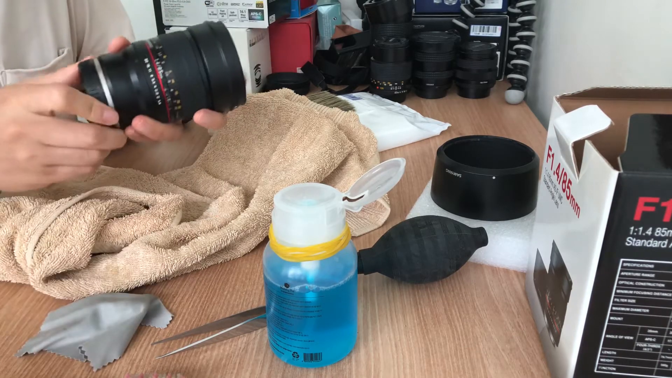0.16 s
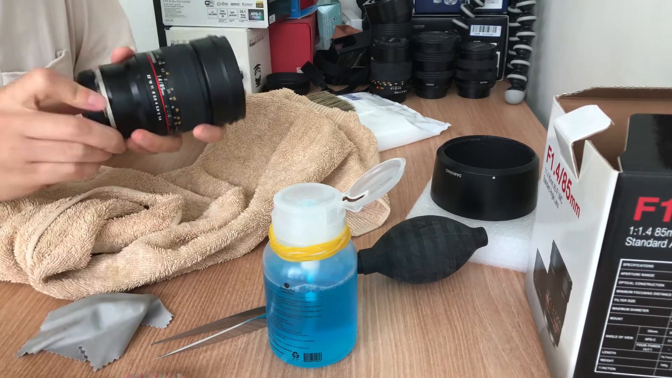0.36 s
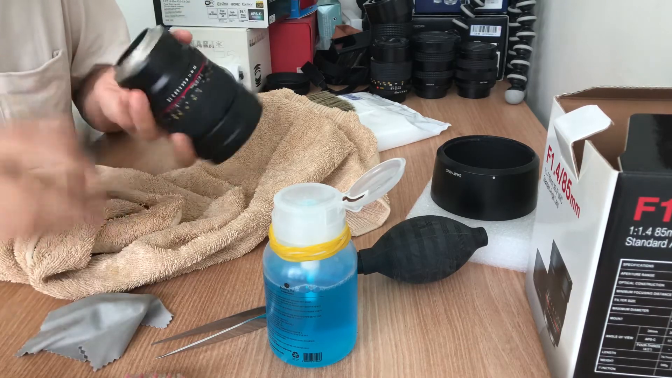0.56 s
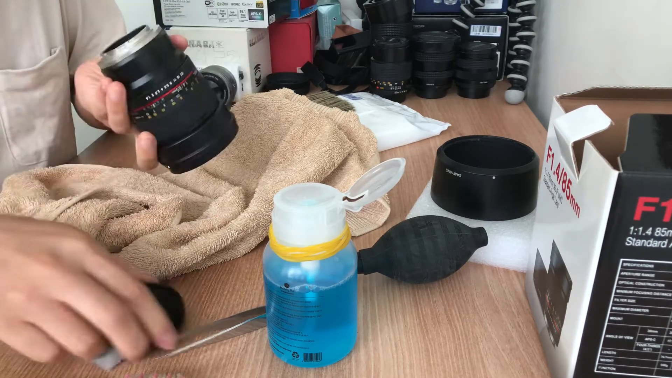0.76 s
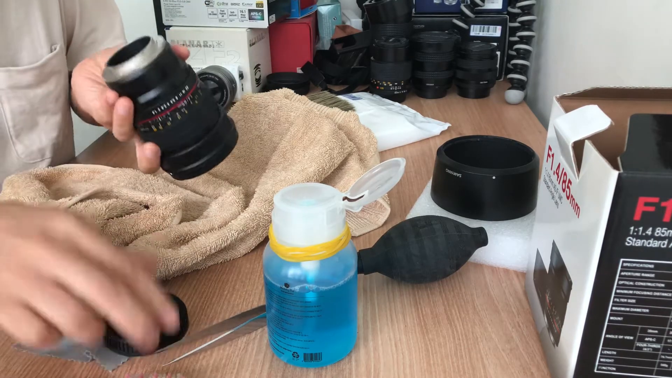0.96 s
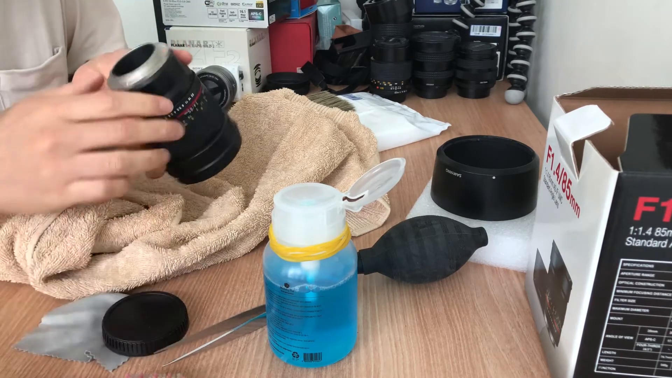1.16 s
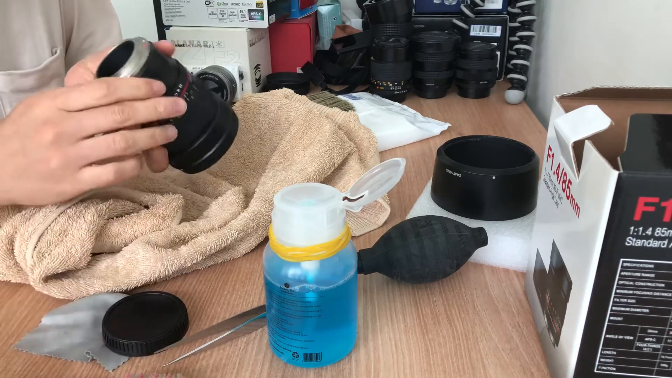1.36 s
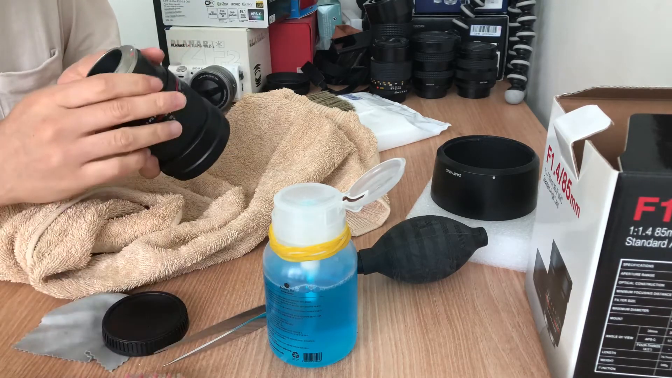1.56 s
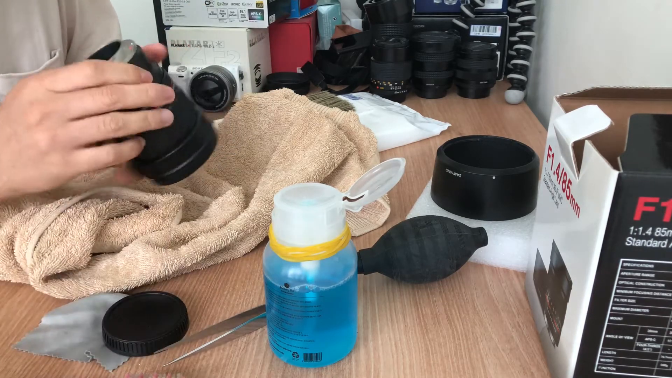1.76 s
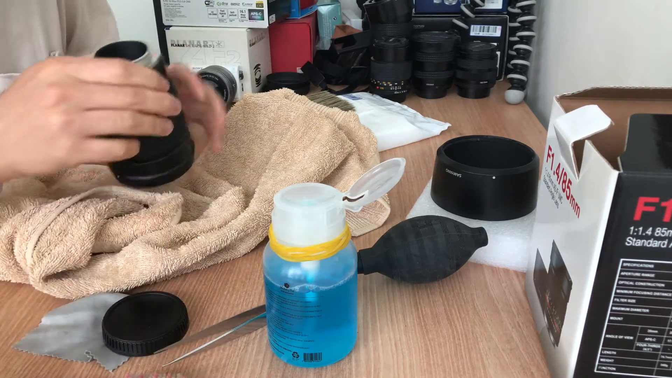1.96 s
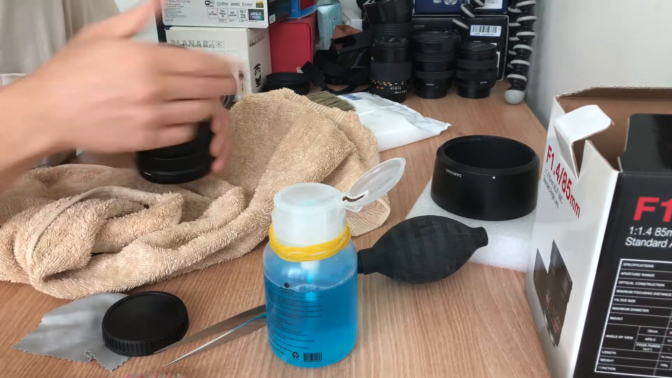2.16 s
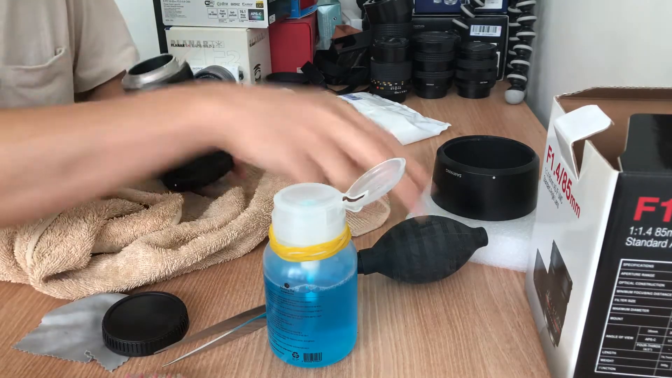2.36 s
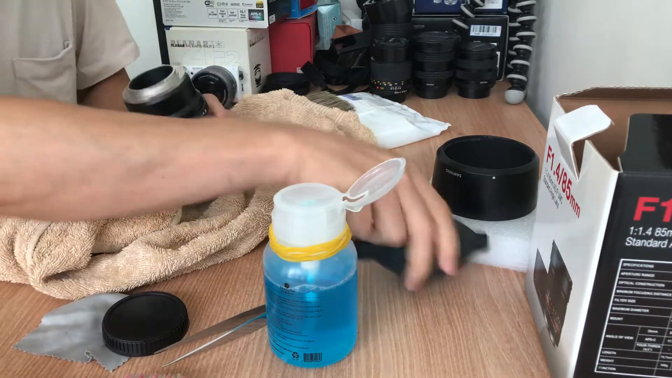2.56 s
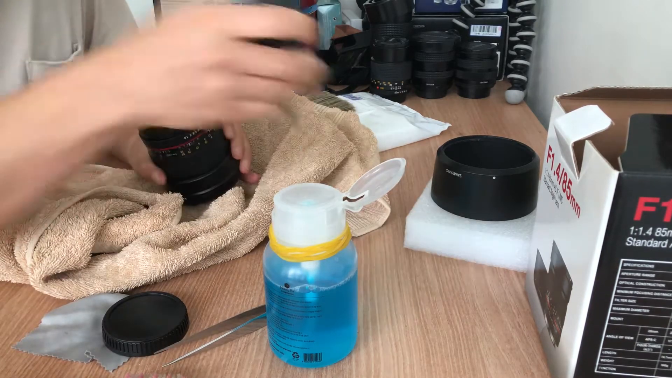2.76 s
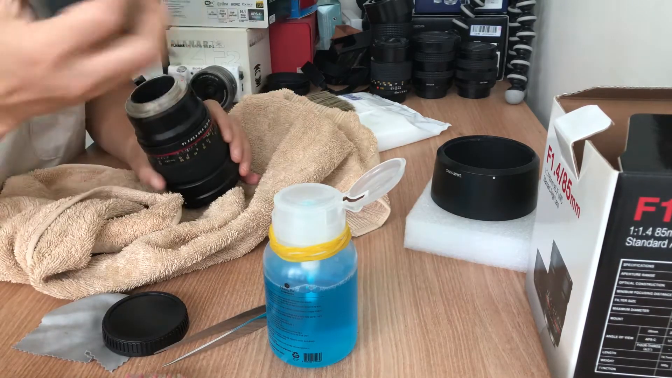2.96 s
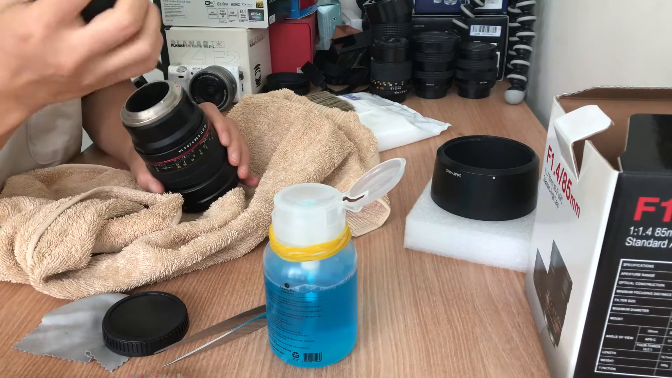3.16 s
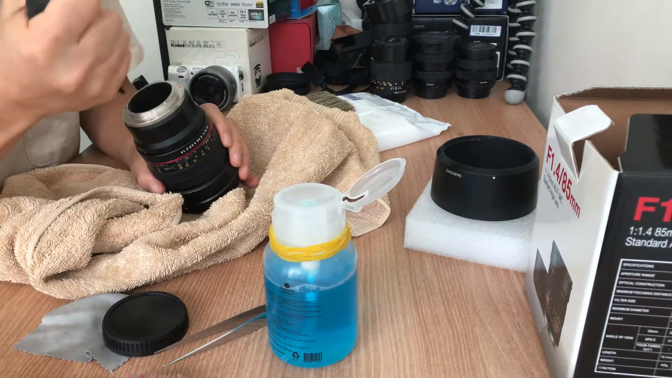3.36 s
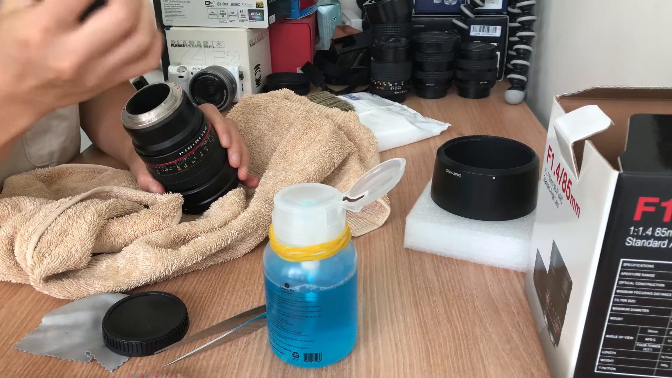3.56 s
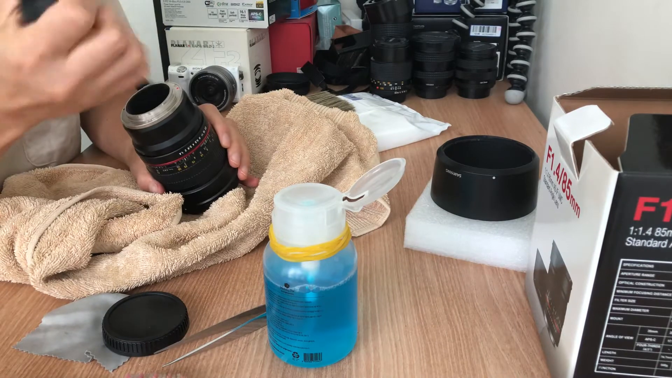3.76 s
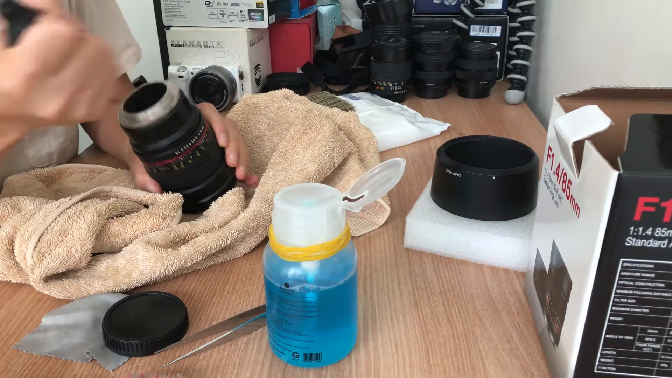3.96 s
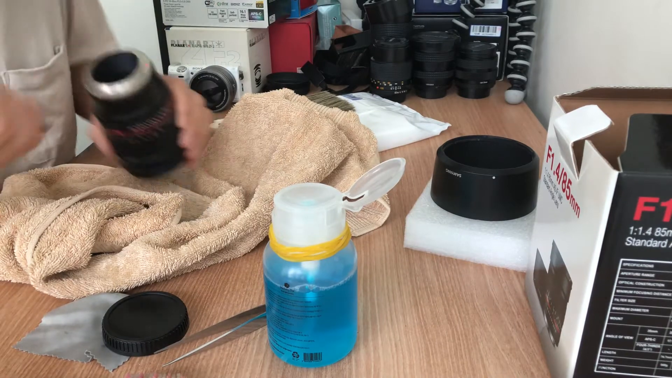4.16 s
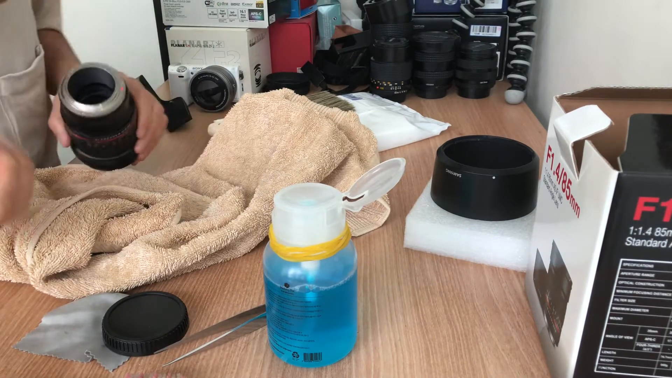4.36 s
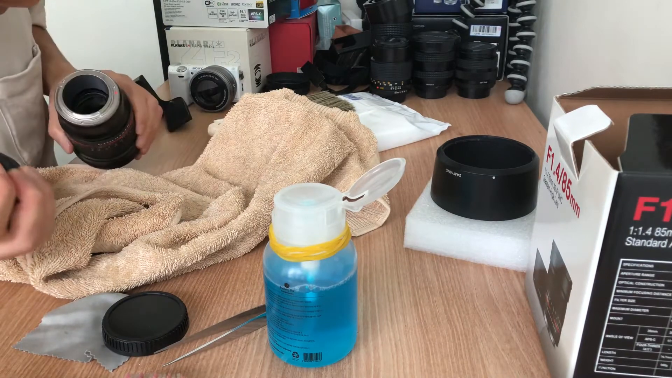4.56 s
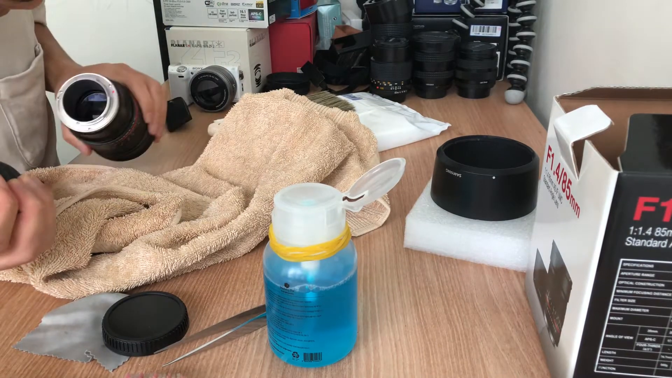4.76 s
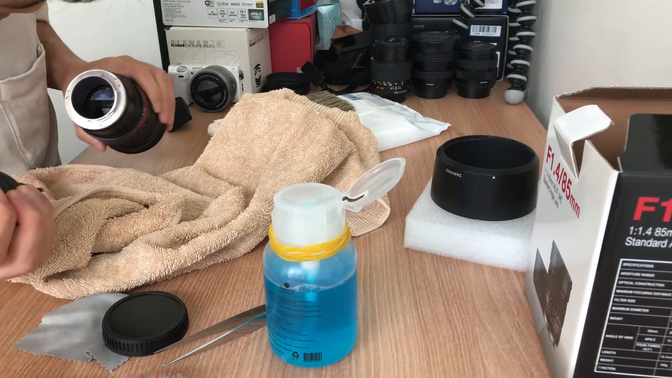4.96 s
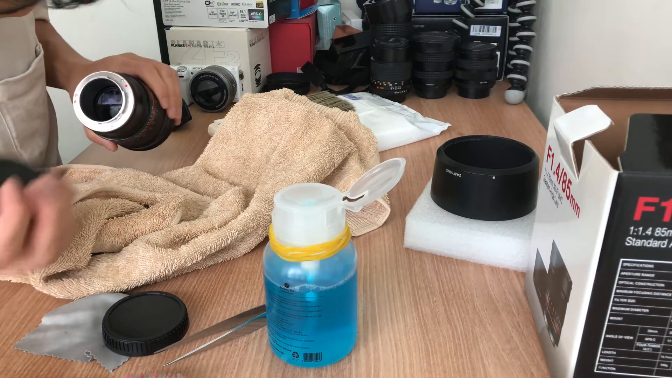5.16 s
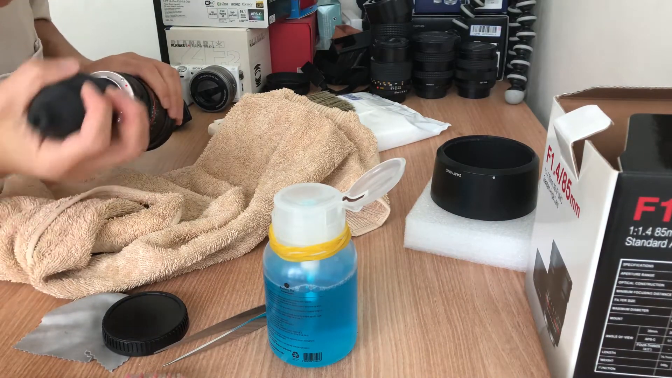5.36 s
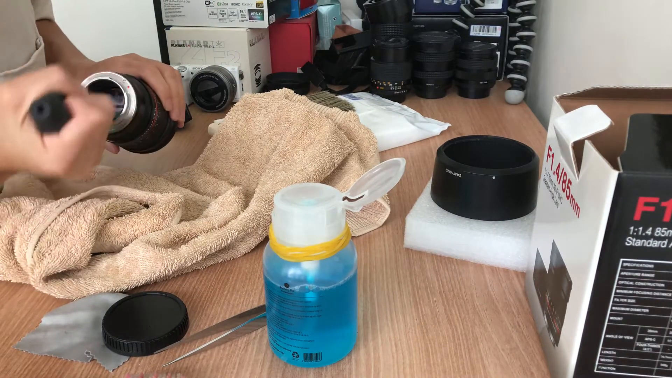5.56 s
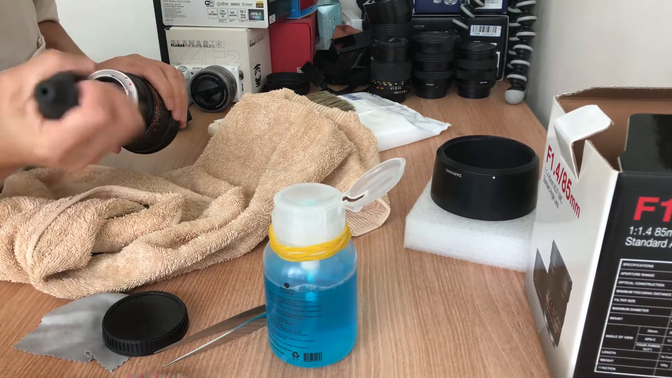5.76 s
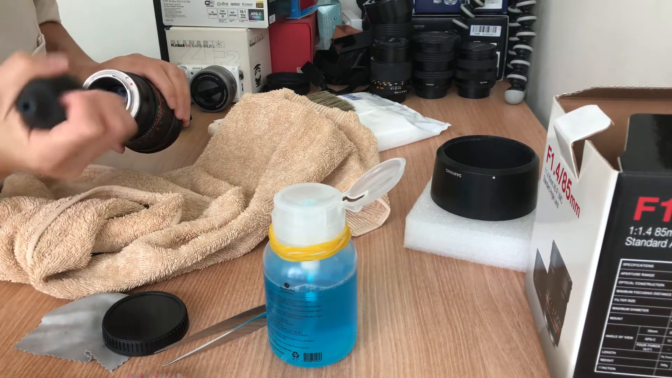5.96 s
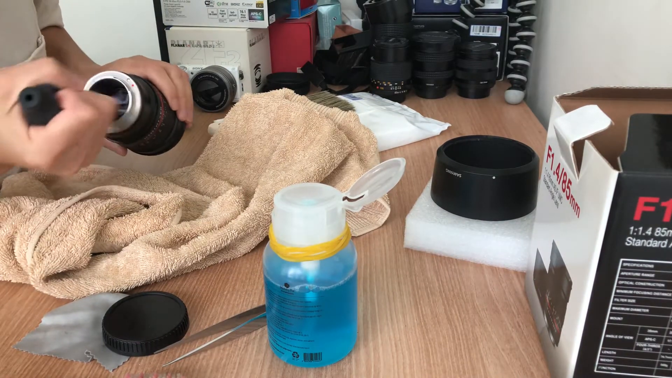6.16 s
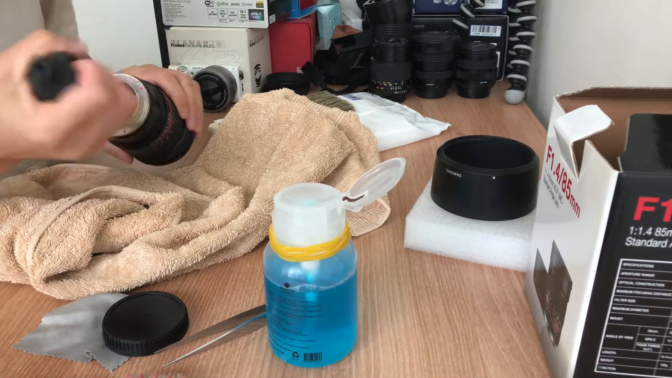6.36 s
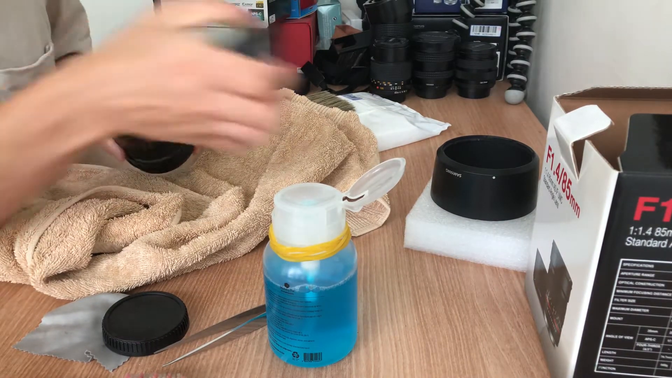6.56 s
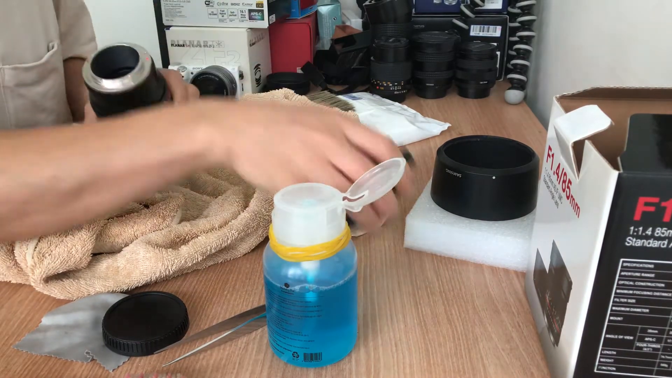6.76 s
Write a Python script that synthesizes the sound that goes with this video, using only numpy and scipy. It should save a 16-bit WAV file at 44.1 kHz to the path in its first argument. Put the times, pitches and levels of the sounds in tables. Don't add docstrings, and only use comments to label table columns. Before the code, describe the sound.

Close, clear indoor sound over a low soft fan rumble. Small plastic clicks come first, then a hard plastic cap lands on wood, rattling rapidly and making steel tweezers ring thinly. Soft rubbing follows for a while. Then sharp bursts of air strike a lens mount, three and later four, hissing brightly with a breathy, hollow pitched resonance; between them the rubber bulb refills with a faint rising wheeze.

```python
import sys
import numpy as np
from scipy import signal
from scipy.fft import rfft, irfft, next_fast_len
from scipy.io import wavfile
from scipy.ndimage import uniform_filter1d, map_coordinates

SR = 44100
rng = np.random.default_rng(int(sys.argv[2]) if len(sys.argv) > 2 else 0)


def output_pcm(signal):
    pcm = np.clip(np.atleast_2d(signal).T, -1, 1) * 32767
    wavfile.write(sys.argv[1], SR, np.round(pcm).astype(np.int16))


def nominal_scale(level):
    x = np.asarray(level, float) / 20
    return 10 ** x


N = 300762

# start_s, hold_s, hiss_db (at end), rim_db (at end, over hiss), spit_db (over hiss)
JET = [(3.315, 0.081, -23.5, 6.5, -2), (3.638, 0.083, -27, 9, -1), (3.948, 0.09, -30, 10, 0),
       (5.516, 0.084, -27, 9.5, 3.5), (5.846, 0.027, -33, 6.5, -2), (5.86, 0.051, -26, 13, -20.5),
       (6.145, 0.08, -31.5, 13.5, -4), (6.454, 0.014, -35.5, 14.5, -16), (6.469, 0.076, -26.5, 1, -6),
       (3.307, .01, -43, 5, -6), (6.432, .012, -44, 4, -3)]
# freq_hz, density_db
NOZZLE = [(10500, -6.5), (12000, -6), (14000, 0), (15800, -0.5), (17000, -26)]
# freq_hz, width_hz, level_db
AWAY = ([(2690, 440, -7.5), (3300, 230, 7.5), (4330, 1900, -10.5)], [(585, 510, -9), (1020, 310, 6.5),
        (1540, 440, 0.5), (2220, 750, -6)])
# start_s, peak_db, crack_db (over peak), ring_db (over peak)
TOUCH = [
    (.843, -23, -24, -1.5),
    (.96, -49.5, -30, -13.5),
]


def unit(x):
    return x / np.sqrt(np.mean(x ** 2) + 1e-20)


def along(points, hz):
    f, v = np.transpose(points)
    return np.interp(np.log(hz + 1), np.log(f + 1), v)


def wobble(rate_hz):
    knots = rng.standard_normal(int(N * rate_hz / SR) + 4)
    return map_coordinates(knots, [np.arange(N) * rate_hz / SR])


def filtered(x, response):
    m = next_fast_len(N + 8192)
    return irfft(rfft(x, m) * response(np.fft.rfftfreq(m, 1 / SR)), m)[..., :N]


def resonant(modes, order=1):
    def response(f):
        total = 0
        for k, (hz, width_hz, db) in enumerate(modes):
            damping = 1j * f * width_hz
            total = total + (-1) ** k * nominal_scale(db / order) * damping / (hz * hz - f * f + damping)
        return total ** order
    return response


def shaped(spectrum):
    points = [(10, -120)] + list(spectrum) + [(21000, -120)]
    return lambda hz: nominal_scale(along(points, hz))


def air(response, eddy_db, patchy_db=0):
    x = rng.standard_normal(N) * nominal_scale(eddy_db * wobble(260))
    if patchy_db:
        z = signal.stft(x, nperseg=256)[2]
        field = uniform_filter1d(rng.standard_normal(z.shape), size=3, axis=0)
        field = uniform_filter1d(field, size=12, axis=1)
        x = signal.istft(z * nominal_scale(patchy_db * unit(field)), nperseg=256)[1][:N]
    return unit(filtered(x, response))


def swells(rows, rise_s, fall_s):
    s, hold, db, grow_db = np.transpose(rows)[..., None]
    t = np.arange(0, N + 32, 32) / SR - s
    level = db + grow_db * (np.clip(t / hold, 0, 1) - 1)
    level = level - 40 * (np.maximum(-t, 0) / rise_s + np.maximum(t - hold, 0) / fall_s)
    return np.interp(np.arange(N) / 32, np.arange(t.shape[1]), nominal_scale(np.maximum(level.max(0), -200)))


def detuned(x, percent):
    return map_coordinates(x, [np.cumsum(1 + percent / 100) % (N - 1)], order=1)


def breathy(rows, width_hz, grow_db, rise_s, fall_s, steady=0):
    t, out = np.arange(N) / SR, np.zeros(N)
    fuzz = unit(filtered(rng.standard_normal((2, N)), lambda f: 1 / (1 + (2 * f / width_hz) ** 2)))
    for s, lasts, from_hz, to_hz, db in rows:
        near = slice(round((s - .15) * SR), round((s + lasts + .2) * SR))
        pitch_hz = np.interp(t[near], [s, s + lasts], [from_hz, to_hz])
        phase = 2 * np.pi * np.cumsum(pitch_hz) / SR
        tone = (fuzz[0, near] + steady) * np.cos(phase) + fuzz[1, near] * np.sin(phase)
        out[near] += swells([(s, lasts, db, grow_db)], rise_s, fall_s)[near] * tone
    return out


def puffs(strikes, squeezes, modes, barrel_db, barrel_grows_db):
    # start_s, cavity_pct, barrel_pct
    aim = [(3.329, 0, -4), (3.42, -2, -1), (3.65, 1.5, -2.5), (3.75, 2, -3), (3.96, -2, 6), (4.05, -1.5, 9),
           (5.53, -1.5, 8), (5.58, -0.6, 9), (5.62, 0.4, 6.5), (5.87, 1.5, -1), (5.931, 3, -1.5),
           (6.15, -2, 3), (6.22, 0.46, 5), (6.44, -1.5, -3), (6.47, 0.4, 3.5), (6.53, 2, 3)]
    land_s, leave_s = 0.013, 0.033
    barrel_lag_s, barrel_leave_s = 0.0014, 0.07
    shake_pct, shake_hz = 1.3, 45

    stray = [(s, lasts, db - 16, 0) for s, lasts, db, _, _ in squeezes]
    cavity = swells(strikes, land_s, leave_s) + swells(stray, 0.013, 0.073)
    barrel_rows = [(s + barrel_lag_s, stays, db + barrel_db, grow_db + barrel_grows_db)
                   for s, stays, db, grow_db in strikes]
    barrel = swells(barrel_rows, land_s, barrel_leave_s)

    aim_s, *aim_pct = np.transpose(aim)
    cavity_pct, barrel_pct = (np.interp(np.arange(N) / SR, aim_s, pct) + shake_pct * wobble(shake_hz)
                              for pct in aim_pct)
    flutter = nominal_scale(0.86 * wobble(70))
    cavity_air = air(resonant(modes[0], order=2), eddy_db=2.5, patchy_db=0.5)
    barrel_air = air(resonant(modes[1], order=2), eddy_db=1.0, patchy_db=2.0)
    return flutter * (cavity * detuned(cavity_air, cavity_pct) + barrel * detuned(barrel_air, barrel_pct))


def flat_puffs():
    # start_s, hold_s, cavity_db (at end), growth_db
    strikes = [
        (5.527, 0.087, -18.5, 0.53),
        (5.866, 0.047, -16.5, 1.1),
        (5.935, 0.033, -28, 4),
        (6.152, 0.063, -14, 9),
    ]
    # freq_hz, width_hz, level_db
    modes = ([(3137, 400, -3.5), (3444, 200, 9), (4240, 1290, -6.5)], [(412, 380, -16), (972, 330, -1),
             (1706, 530, 0.5), (2540, 400, -2)])
    return puffs(strikes, JET[3:7], modes, barrel_db=-11.5, barrel_grows_db=0.5)


def tilted_puffs():
    # start_s, hold_s, cavity_db (at end), growth_db
    strikes = [
        (3.306, .016, -40, 4.5),
        (3.327, 0.087, -16, 3),
        (3.647, 0.1, -19, -0.5),
        (3.955, 0.093, -16, 5),
    ]
    # freq_hz, width_hz, level_db
    modes = ([(3320, 450, -1), (3715, 360, 5), (4020, 700, -1)], [(398, 120, -18), (896, 246, 0),
             (1088, 272, 0.5), (1330, 270, 0.5), (1740, 1050, -5), (2650, 1000, -0.5)])
    return puffs(strikes, JET[:3], modes, barrel_db=-8.0, barrel_grows_db=0.0)


def drawn_back_puff():
    # start_s, hold_s, cavity_db (at end), growth_db
    strikes = [
        (6.437, 0.0057, -30, -0.5),
        (6.457, 0.017, -14.5, 8),
        (6.518, 0.016, -24, 5),
    ]
    return puffs(strikes, JET[7:9], AWAY, barrel_db=-23.5, barrel_grows_db=-8)


def slipstream():
    # start_s, hold_s, end_db, growth_db
    slips = [
        (6.444, 0.024, -39, -2),
        (6.48, 0.085, -44, -1),
    ]
    return swells(slips, 0.013, 0.07) * air(resonant(AWAY[1], order=2), eddy_db=4.5, patchy_db=0.5)


def nozzle():
    # start_s, hold_s, hiss_db
    glances = [
        (4.057, .006, -27.5),
        (5.931, .01, -20),
        (6.223, .008, -15),
        (6.481, 0.039, -21.5),
    ]
    # freq_hz, width_hz, level_db
    rim_modes = [(6470, 1300, -0.5), (7080, 700, 1), (7600, 500, 0), (8390, 360, 1), (9520, 1500, -4)]
    open_s, close_s, spit_s = 0.013, 0.073, 0.03

    hiss = swells([(s, lasts, db, 2) for s, lasts, db, _, _ in JET], open_s, close_s)
    spit = swells([(s, .004, db + spit_db, 0) for s, _, db, _, spit_db in JET], open_s, spit_s)
    glance = swells([(s, lasts, db, 0) for s, lasts, db in glances], 0.043, 0.07)
    rim = swells([(s, lasts, db + rim_db, 12) for s, lasts, db, rim_db, _ in JET], open_s, close_s)
    return ((hiss + spit + glance) * air(shaped(NOZZLE), eddy_db=3.0, patchy_db=1.0)
            + rim * air(resonant(rim_modes), eddy_db=2.0, patchy_db=3.5))


def blown_tones():
    # start_s, hold_s, from_hz, to_hz, end_db
    tones = [(5.53, .09, 3250, 3100, -24), (3.96, .09, 2450, 2400, -33), (3.97, .085, 980, 1060, -35),
             (3.99, .065, 3950, 4050, -28), (6.175, .05, 2350, 2330, -34), (6.175, .05, 4150, 4250, -28),
             (5.565, .04, 1900, 1930, -33), (3.34, .075, 2350, 2300, -34), (6.455, .022, 3250, 3350, -21),
             (5.95, 0.108, 1500, 1400, -51), (6.19, 0.036, 3600, 5500, -33),
             (6.15, 0.057, 6900, 8000, -34.5), (6.25, 0.074, 4700, 2800, -54),
             (3.062, 0.015, 6000, 5900, -40), (3.062, .014, 7900, 7950, -43.5),
             (3.085, 0.0299, 5800, 5600, -56), (3.1, 0.033, 10700, 10300, -64),
             (2.92, .07, 4500, 4400, -65), (2.8, .03, 7100, 6300, -62), (2.94, .05, 3600, 4100, -64),
             (5.885, 0.032, 6500, 9500, -35)]
    return breathy(tones, width_hz=320, grow_db=-2.0, rise_s=.02, fall_s=0.042)


def refill():
    # start_s, hold_s, whistle_db (at end), hiss_db (at end, over whistle), hiss_growth_db
    breaths = [
        (3.482, 0.11, -43.5, 5, 13),
        (3.8, 0.11, -43, 2.5, 8.5),
        (4.136, 0.13, -45.5, 3.5, 6),
        (5.681, 0.11, -44.5, 8.5, 14),
        (5.996, 0.123, -43, 6.5, 6),
        (6.293, 0.11, -44.5, 8.5, 6.5),
        (6.585, 0.12, -41.5, -2.5, -9),
    ]
    # freq_hz, width_hz, level_db
    valve = [(3390, 1630, -11), (6650, 1200, -0.5), (8100, 1300, 1)]
    # freq_hz, density_db
    valve_hiss = [(1000, -17), (5000, -16), (10500, -14.5), (12300, -11.5), (14200, -2), (15500, -2.5),
                  (17000, -16.5)]
    open_s, shut_s = 0.1, 0.03

    whistle = swells([(s, lasts, db, 3) for s, lasts, db, _, _ in breaths], open_s, shut_s)
    hiss = swells([(s, lasts, db + hiss_db, grow_db) for s, lasts, db, hiss_db, grow_db in breaths],
                  open_s, shut_s)
    return (whistle * air(resonant(valve), eddy_db=-0.5, patchy_db=5.0)
            + hiss * air(shaped(valve_hiss), eddy_db=2.0, patchy_db=1.5))


def valve_whistles():
    # start_s, hold_s, from_hz, to_hz, end_db
    glides = [
        (3.52, 0.076, 7900, 8250, -43),
        (3.82, 0.1, 7440, 8330, -46),
        (4.14, .125, 7600, 8000, -49),
        (5.75, 0.053, 8170, 8500, -48),
        (6.02, .1, 7370, 7900, -55),
        (6.32, 0.1, 7600, 7900, -52),
        (6.62, .055, 7500, 8150, -46),
    ]
    return breathy(glides, width_hz=300, grow_db=3.5, rise_s=.1, fall_s=.04)


def struck(contacts, body, metal, scatter_db):
    out, t = np.zeros(N + SR), np.arange(SR) / SR
    impulse_response = filtered(np.arange(N) == 0, resonant(body))[:SR // 10]
    for s, db, crack_db, ring_db in contacts:
        noise = rng.standard_normal(SR)
        rattle = 0.6 * nominal_scale(-60 * t / 0.00047) + 0.3 * nominal_scale(-60 * t / 0.03)
        chatter = 3 * (t == 0) + noise * rattle
        clack = signal.fftconvolve(chatter, impulse_response)[:SR]
        crack = nominal_scale(crack_db - 60 * t / 0.013) * noise
        steel = np.zeros(SR)
        for hz, level_db, t60_s in metal:
            mode_db = level_db + scatter_db * rng.standard_normal()
            steel += nominal_scale(mode_db - 60 * t / t60_s) * np.sin(2 * np.pi * hz * t)
        ring = nominal_scale(ring_db) * steel * (1 - np.exp(-t / 0.00048))
        out[round(s * SR):][:SR] += nominal_scale(db) * (clack / np.abs(clack).max() + crack + ring)
    return out[:N]


def cap_drop():
    # start_s, peak_db, crack_db (over peak), ring_db (over peak)
    bounces = [(.928, -6.5, -24, -43), (.9325, -14.5, -29, -28), (.960, -11.5, -21, -34),
               (.9645, -28, -22, -36), (.970, -11, -27, -47), (.9795, -13, -26, -36), (.984, -14, -28, -28),
               (1.0055, -15, -20, -30), (1.010, -17, -28, -34), (1.0205, -14, -27, -28),
               (1.029, -21, -31, -34), (1.035, -25, -26, -30), (1.042, -20, -30, -29),
               (1.05, -23.5, -36, -37), (1.058, -25, -40, -35), (1.065, -29, -40, -40),
               (1.074, -32, -40, -35)]
    # freq_hz, width_hz, level_db
    plastic = [(325, 70, -5), (926, 297, 1), (1236, 710, -1), (1794, 370, 2.5), (2430, 150, 1.5),
               (2700, 550, -2.5), (4600, 1450, -12), (7800, 210, -19)]
    # freq_hz, level_db, t60_s
    tweezers = [(2390, -2, 0.1), (6000, -5, 0.09), (9100, -8, 0.15), (5700, -7, .19), (10120, -5, 0.23),
                (10700, -12, 0.23), (11250, -18, .15), (12290, -14, 0.14), (13050, -15, 0.2),
                (13710, -14, .2), (14780, -15, .18), (15090, -11, .25), (15730, -18, .2)]
    # freq_hz, level_db, t60_s
    prong = [(6960, 2.5, 1.5)]
    return (struck(bounces, plastic, tweezers, scatter_db=3.0)
            + struck(TOUCH[1:], plastic, prong, scatter_db=-1.0))


def rim_graze():
    # freq_hz, width_hz, level_db
    wood = [(376, 140, 0.5), (687, 36, 7), (920, 200, -1), (1260, 170, 0), (1920, 470, -2)]
    # freq_hz, level_db, t60_s
    grazed_steel = [(2340, 3, 0.0095), (2370, -35, 0.23), (4470, -36, 0.2), (4410, -26, 0.2),
                    (1960, -34, .09), (5300, -40, .16), (4440, 1, 0.014), (7020, -32, 0.62),
                    (7230, -8, 0.0089), (8150, -6, 0.0078), (9200, -13, .008)]
    return nominal_scale(1.5) * struck(TOUCH[:1], wood, grazed_steel, scatter_db=1.5)


def cavity_and_prong_buzz():
    # start_s, hold_s, from_hz, to_hz, end_db
    buzzes = [
        (5.95, .16, 3500, 3450, -44),
        (6.24, .1, 3480, 3450, -44),
        (5.64, .07, 3450, 3450, -43),
        (1.006, 0.029, 5970, 5990, -42),
        (1.045, 0.036, 2396, 2700, -41.5),
        (.955, 0.051, 5500, 5970, -51),
        (.452, .022, 2700, 2330, -52),
        (.855, 0.079, 2330, 2300, -50),
    ]
    return breathy(buzzes, width_hz=76, grow_db=9, rise_s=.01, fall_s=0.013, steady=1.4)


def hands():
    # start_s, hold_s, hiss_db, body_db (over hiss), thin_db (over hiss)
    rubs = [(0, .8, -88, 12, -7), (.018, .004, -73, -8, -14), (.312, 0.028, -64, 7, 4),
            (.3, .015, -76, 0.4, 3), (1.15, .06, -80, 3, 6), (.435, 0.028, -64, 1, 4),
            (.423, .01, -68, -6, -3), (.67, .04, -71.5, 9, -8), (.85, 0.085, -69.5, 17.5, -8),
            (1.4, 1.1, -89, 8, 7), (1.72, 0.079, -72, 4, -3), (1.82, 0.055, -69, 0, -1),
            (2.132, 0.0072, -63, -1, -3), (2.185, 0.029, -69, 4, 3), (2.366, 0.0037, -69, 25.5, -14),
            (2.375, .035, -84, 26, -14), (2.592, .003, -74, 5, -2), (2.683, 0.0028, -69.5, 9, -4),
            (2.62, 0.22, -85, 9, -6), (2.8, 0.042, -62, -5, -4), (2.93, .06, -57, -6, -13),
            (3.0, 0.05, -58, -5.5, -14), (3.047, .012, -49, -13, -3), (3.059, 0.016, -38.5, -11, 4),
            (2.85, .07, -70, -2, -6), (3.09, 0.047, -63, -4, -4)]
    # freq_hz, density_db
    skin = [(2700, -30.5), (4600, -4), (5900, -3), (7000, -8), (7900, -3.5), (9000, -10), (11500, -12),
            (14000, -34)]
    # freq_hz, density_db
    cloth = [(500, -21), (1000, -1), (2300, -1), (4000, -7.5), (6000, -35.5)]

    s, lasts, db, body_db, thin_db = np.transpose(rubs)
    hiss, body, thin = (nominal_scale(3.1 * wobble(25))
                        * swells(np.transpose([s, lasts, db + over_db, 0 * s]), 0.018, 0.043)
                        for over_db in (0, body_db, thin_db))
    return (hiss * air(shaped(skin), eddy_db=3, patchy_db=4)
            + nominal_scale(2.0) * body * air(shaped(cloth), eddy_db=4)
            + thin * air(shaped(NOZZLE), eddy_db=3.5, patchy_db=2.0))


def ticks():
    # start_s, peak_db, pitch_hz
    small = [(0.017, -57, 8820), (0.336, -51, 6500), (0.4474, -48, 7860), (0.4483, -44, 4640),
             (.455, -50, 9300), (.466, -53, 8900), (.4355, -53, 8700), (0.6254, -56, 7500),
             (0.6948, -54, 7450), (0.7746, -55.5, 7700), (1.2614, -68, 9000), (1.654, -58, 9610),
             (1.7295, -53, 6020), (1.7649, -55, 14000), (1.7818, -60, 6060), (2.1375, -58, 8300),
             (2.2137, -59, 6190), (2.6803, -59, 9300), (3.6104, -42, 7850)]
    # start_s, peak_db, pitch_hz, t60_s, crack_db
    knocks_and_pings = [(0.313, -39, 2050, 0.034, -33), (.318, -42, 2350, .02, -30), (.928, -28, 330, .04, -40),
                        (.843, -33, 650, .02, -40), (.844, -33, 1200, .015, -40), (0.321, -34.5, 770, 0.012, -40),
                        (.338, -42, 646, 0.018, -27), (0.435, -43, 2340, 0.034, -40), (0.448, -43, 2290, 0.057, -37),
                        (0.465, -50, 2250, 0.023, -40), (2.36, -31, 1130, 0.02, -48), (2.366, -50, 2900, .015, -30),
                        (2.132, -53, 3700, .012, -12), (2.367, -31.5, 886, 0.023, -42), (2.38, -36, 1400, .012, -48),
                        (2.682, -45, 3050, .015, -20),
                        (.827, -55, 6500, .005, 2), (.969, -26, 8150, 0.015, -30), (.979, -29, 7600, .015, -25),
             (.436, -36.5, 830, 0.011, -8), (.468, -49, 770, 0.055, -38), (1.1526, -44, 6150, .016, -32),
             (1.261, -66, 15000, .008, -5)]

    out, t = np.zeros(N), np.arange(SR // 20) / SR
    small = [row + (0.01224, -7) for row in small]  # t60_s, crack_db
    for s, db, hz, t60_s, crack_db in small + knocks_and_pings:
        noise = rng.standard_normal(len(t) + 1)
        drift = 0.12 * np.cumsum(noise[1:])
        knock = np.sin(2 * np.pi * hz * t + drift) + nominal_scale(crack_db) * np.diff(noise)
        out[round(s * SR):][:len(t)] += nominal_scale(db + 1.0 - 60 * t / max(t60_s, .002)) * knock
    return out


def room(x):
    # freq_hz, t60_s
    decay = [(300, 0.58), (2000, 0.49), (6000, 0.36), (15000, 0.23)]
    out, step = np.zeros(N + SR), SR // 3
    for at in range(0, N, step):
        hz, t, z = signal.stft(rng.standard_normal(SR // 2), SR, nperseg=256)
        fade = nominal_scale(-60 * t / along(decay, hz)[:, None])
        tail = signal.istft(z * fade, SR, nperseg=256)[1]
        wet = signal.fftconvolve(x[at:at + step], tail / np.linalg.norm(tail))
        out[at + 150:][:len(wet)] += wet
    return out[:N]


def fan():
    # freq_hz, density_db
    bed_spectrum = [(15, -69), (25, -32.5), (43, -11), (61, -10), (190, -1.5), (405, -15), (439, -23.5),
                    (641, -19.5), (863, -22.5), (1070, -24.5), (1260, -25), (3080, -31.5), (3920, -31.5),
                    (4250, -38), (16000, -63)]
    # freq_hz, width_hz, rms_db
    hum = [(71, 6.2, -57), (122.5, 16, -52.5), (141, 9.2, -62), (1061, 51, -67), (2500, 71, -79.5),
           (4180, 230, -81)]
    out = nominal_scale(-48 + 0.33 * wobble(9.8)) * air(shaped(bed_spectrum), eddy_db=0.2)
    for hz, width_hz, db in hum:
        tone = air(resonant([(hz, width_hz, 0)], order=2), eddy_db=0.5)
        out += nominal_scale(db + 0.52 * wobble(2.7)) * tone
    return out


def whines():
    # start_s, end_s, freq_hz, width_hz, rms_db
    spells = [(1.35, 2.25, 3150, 60, -70), (4.95, 5.2, 4050, 120, -72), (4.45, 4.65, 660, 30, -67),
              (1.5, 2.0, 3750, 80, -73), (4.5, 5.1, 2800, 90, -74), (4.7, 4.95, 1530, 60, -72),
              (5.17, 5.24, 2450, 60, -70)]
    t, out = np.arange(N) / SR, np.zeros(N)
    for start_s, end_s, hz, width_hz, db in spells:
        fade = np.clip(np.minimum(t - start_s, end_s - t) / 0.06 + 1, 0, 1)
        out += nominal_scale(db) * fade * air(resonant([(hz, width_hz, 0)], order=2), eddy_db=2.0)
    return out


def scene():
    # freq_hz, level_db
    aside = [(400, -4), (1000, -3), (2000, 1.5), (3300, -7), (4200, -6), (5500, 4), (16000, -1)]
    flat = flat_puffs() + nozzle()
    tilted = tilted_puffs() + drawn_back_puff() + slipstream()
    blown = blown_tones()
    suck = refill() + valve_whistles()
    drop = cap_drop()
    graze = rim_graze()
    touch = hands() + ticks() + cavity_and_prong_buzz()
    wet = room(nominal_scale(-8.5) * flat + nominal_scale(-8.5) * filtered(tilted, shaped(aside)) + nominal_scale(-6.5) * drop
               + nominal_scale(-7) * touch + nominal_scale(-7) * graze + nominal_scale(-6.5) * suck + nominal_scale(-14) * blown)
    return (flat + tilted + drop + touch + graze + suck + blown + wet + fan() + whines())[None]


def roll_off(x):
    return signal.sosfilt(signal.butter(12, 16970, fs=SR, output="sos"), x)


def record(dry):
    # freq_hz, density_db
    mic = [(3000, -30.5), (7000, -6.5), (10700, 2.5), (15800, -6)]
    x = dry + nominal_scale(-83.5) * air(shaped(mic), eddy_db=-1.0)
    x = x / (1 + np.abs(x / .9) ** 4) ** (1 / 4)
    mix = filtered(x, lambda hz: 1 / (1 + (hz / 15800) ** 300))
    return roll_off(mix)


dry = scene()
out = record(dry)
output_pcm(out)
```